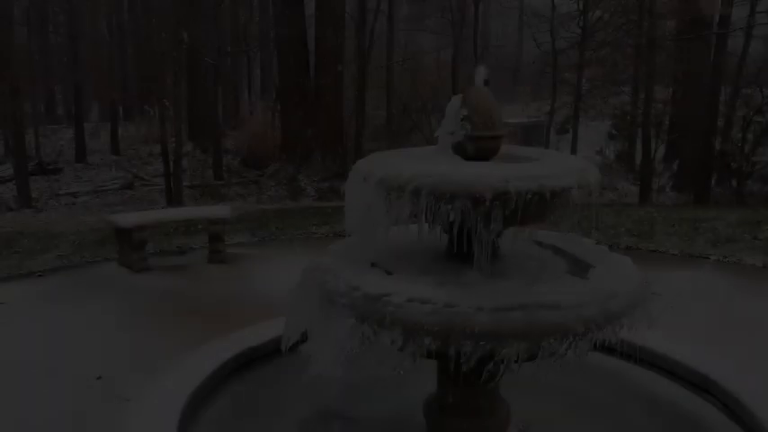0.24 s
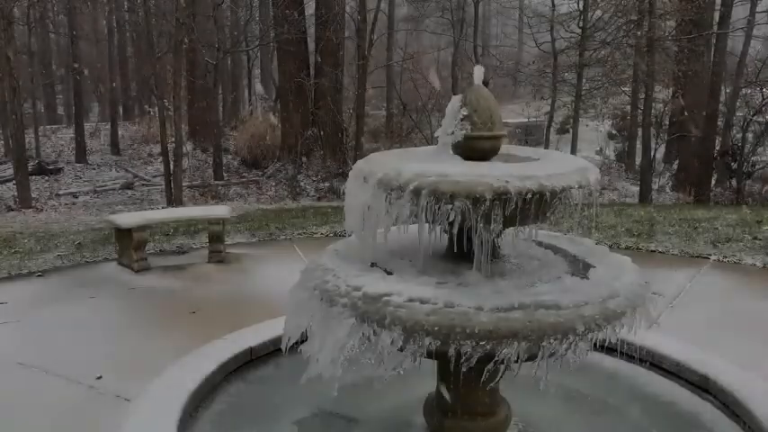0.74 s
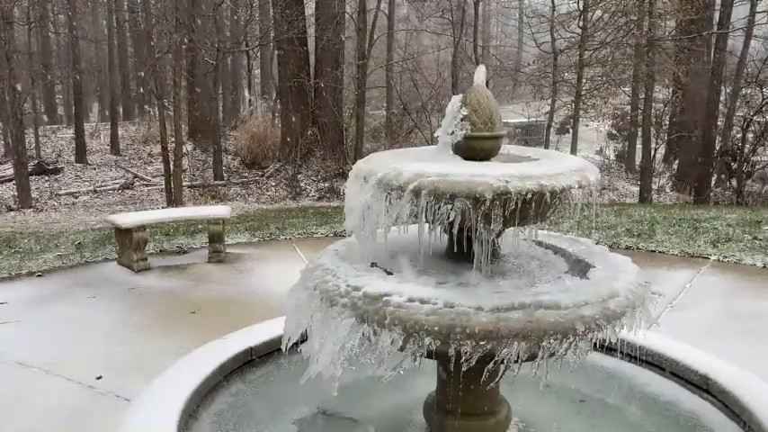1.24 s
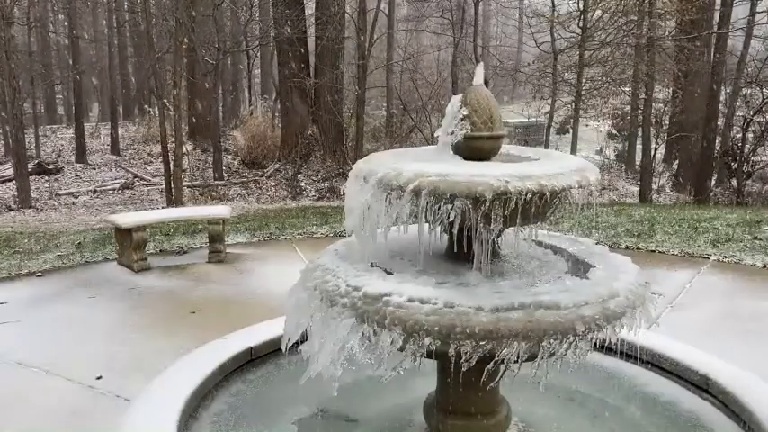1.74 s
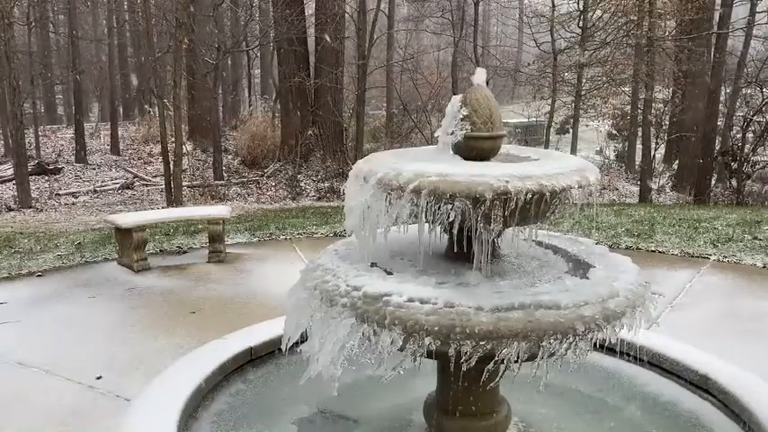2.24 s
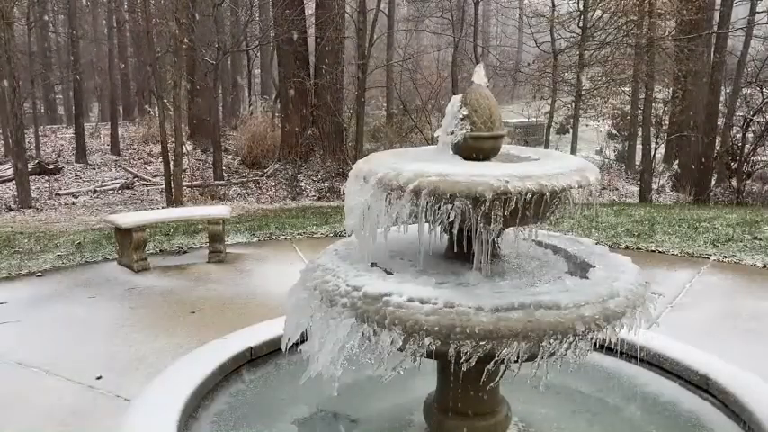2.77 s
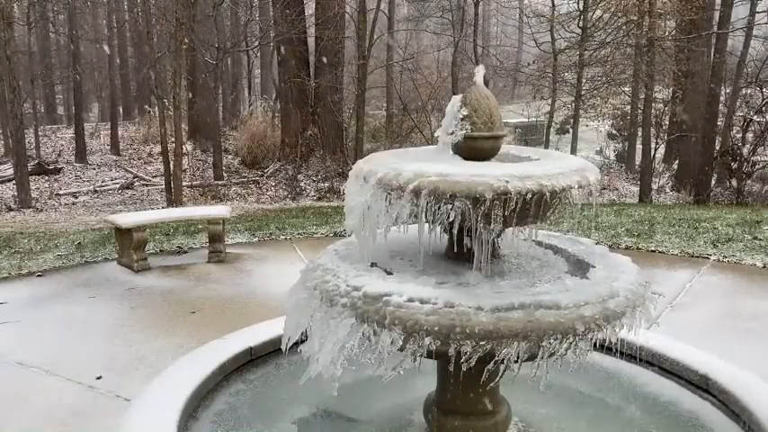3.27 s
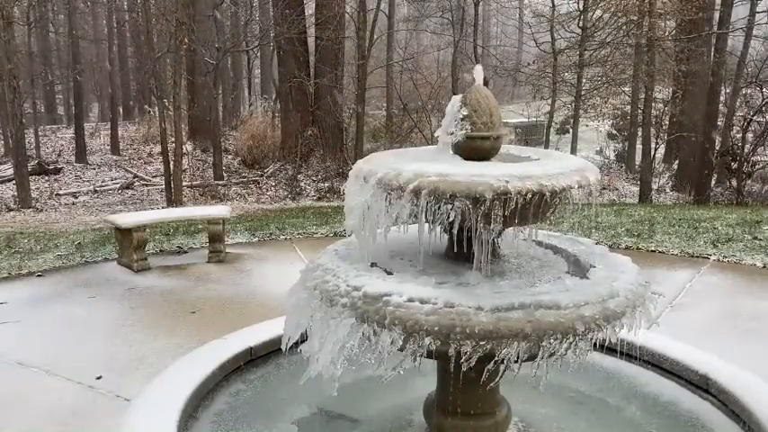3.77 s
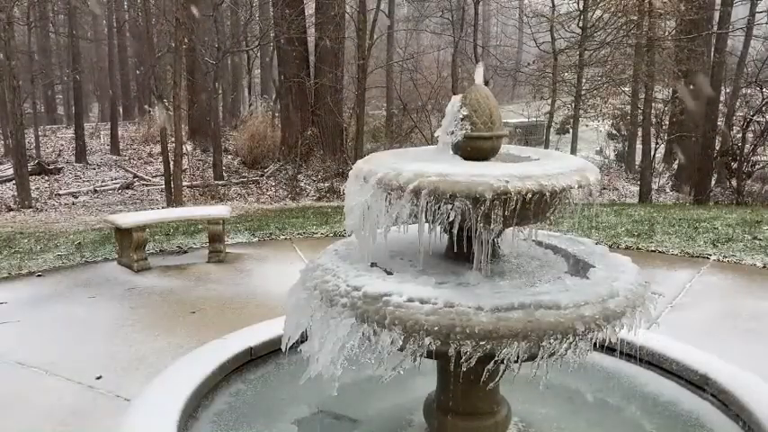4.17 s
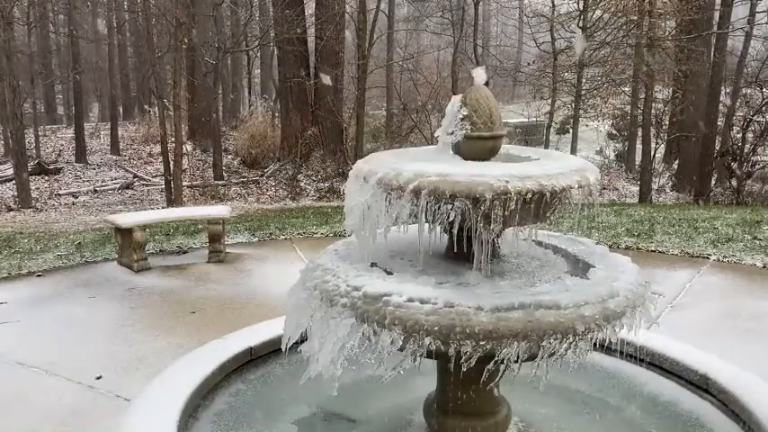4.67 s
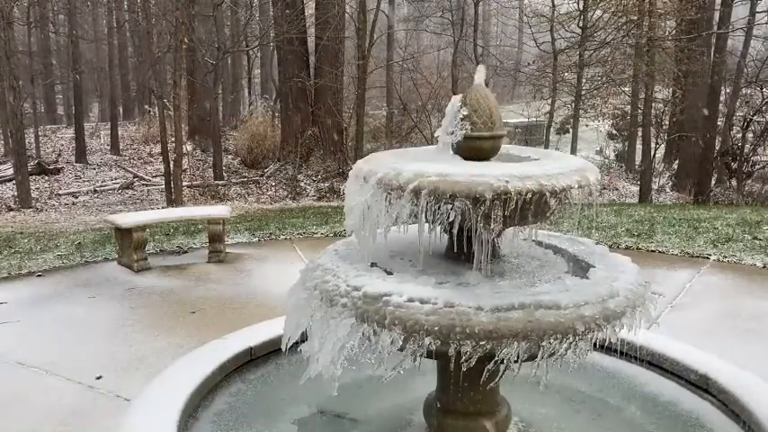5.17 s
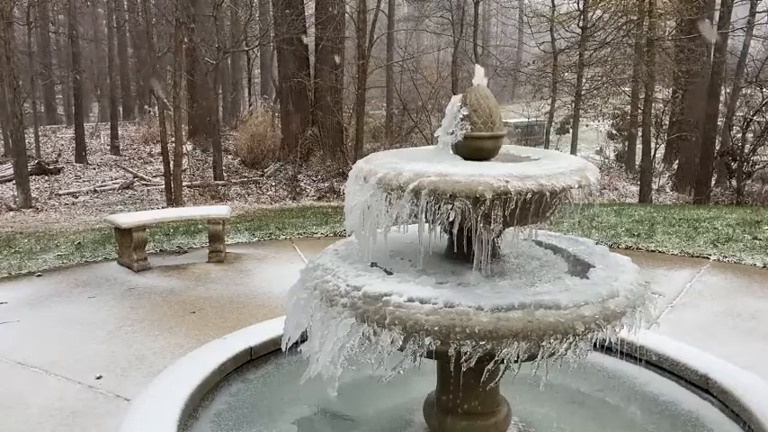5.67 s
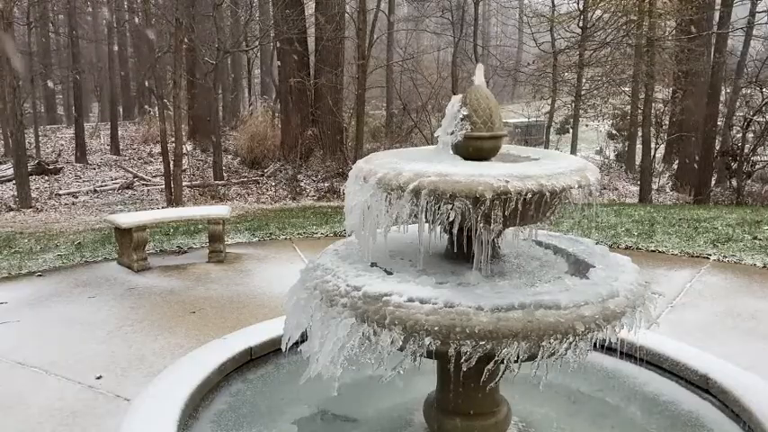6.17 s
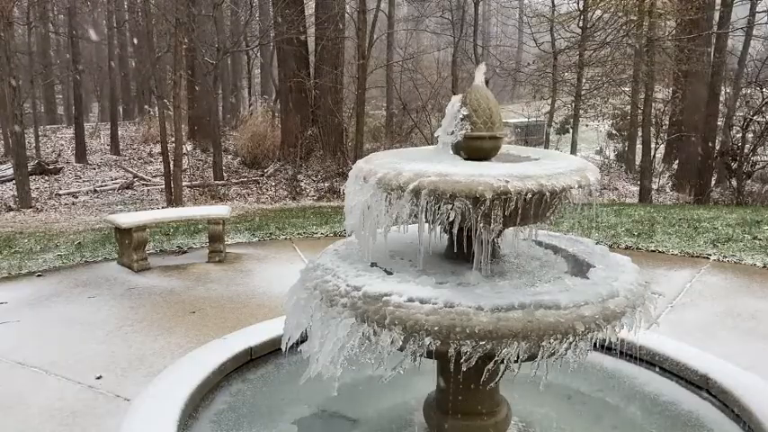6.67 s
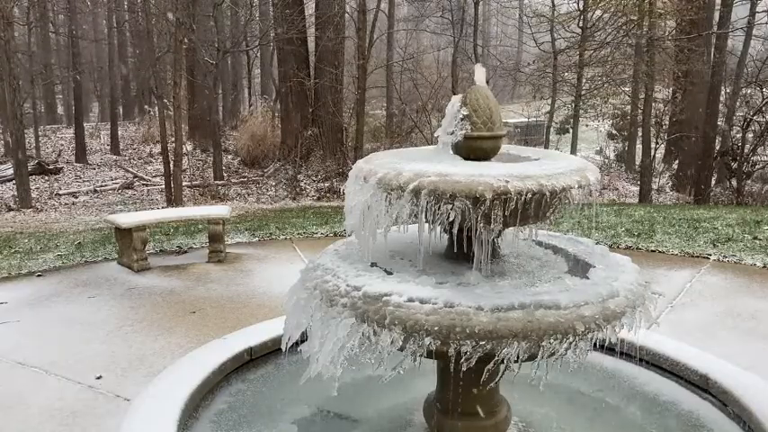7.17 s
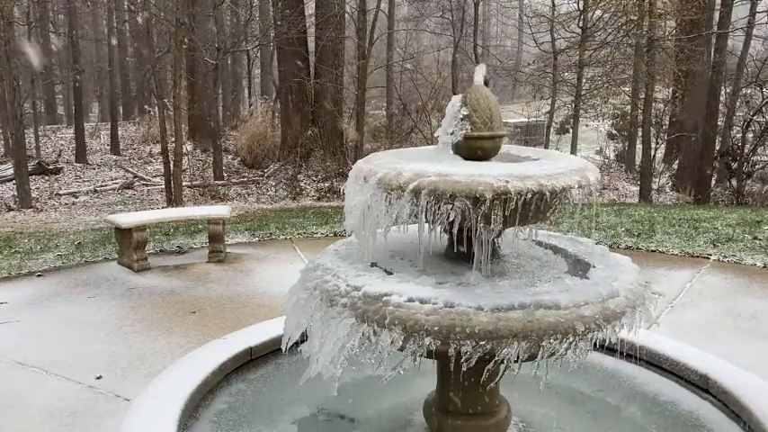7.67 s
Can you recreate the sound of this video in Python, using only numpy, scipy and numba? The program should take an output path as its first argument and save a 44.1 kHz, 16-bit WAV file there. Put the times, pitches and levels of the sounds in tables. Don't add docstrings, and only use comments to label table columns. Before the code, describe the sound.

A half-frozen fountain gurgles, fizzes and drips close by outdoors, with sharp splats on ice and a faint far engine late on.

```python
import sys
import numpy as np
from scipy import signal
from scipy.fft import rfft, irfft, next_fast_len
from scipy.io import wavfile
from scipy.ndimage import uniform_filter1d
from numba import njit

SR = 44100
rng = np.random.default_rng(int(sys.argv[2]) if len(sys.argv) > 2 else 0)


def generate_wav(signal):
    frames = np.transpose(np.atleast_2d(signal))
    scaled = np.clip(frames, -1, 1) * 32767
    pcm = np.round(scaled).astype(np.int16)
    wavfile.write(sys.argv[1], SR, pcm)


def voltage_ratio(level):
    return 10 ** (np.asarray(level, float) / 20)


N = 348732
TIME_S = np.arange(N) / SR
PADDED = next_fast_len(N)
FREQS = np.fft.rfftfreq(PADDED, 1 / SR)

# frequency in Hz, level in dB per Hz.
WATER_SPECTRUM = [(250, -14.5), (350, -17.5), (500, -11.5), (800, -11), (1300, -11), (1800, -13.5),
                  (2300, -20), (3500, -23), (5000, -23.5), (7500, -23.5), (8500, -21), (11000, -24.5),
                  (13000, -28), (15500, -27.5)]
# time in seconds, level in dB.
RIM_FLOW = [(1.1, -1.5), (1.5, -0.4), (2.0, -0.2), (2.35, -4.5), (2.6, 0.2), (2.85, -1.3), (3.3, -0.65),
            (3.95, -2), (4.6, -0.8), (5.1, -1.2), (5.4, -1.1), (5.85, -0.2), (6.35, -2.5), (6.85, -0.3),
            (7.35, -1.1), (7.6, 1.1), (7.9, -1)]
# frequency in Hz, lateness of the left port in samples.
LEFT_PORT_LAG = [(2200, 3), (4800, 3.66), (9000, 3.49), (12000, 3.7), (14000, 2.95), (15600, 3.5)]
# frequency in Hz, level in dB per Hz.
ROAD_SPECTRUM = [(15, -44), (25, -37), (45, -5), (70, 3), (86, -1.5), (162, -11), (243, -15.5),
                 (314, -19.5), (400, -22), (520, -46), (880, -120)]
# time in seconds, level in dB.
ROAD_SWELL = [(1.1, -1.1), (2.1, -.8), (2.85, -0.2), (3.8, 1.1), (4.15, -0.5), (4.8, -0.7), (5.6, 0.5),
              (5.9, 0.3), (6.5, 1.3), (7.9, 1)]
# peak in seconds, level in dB, pitch in Hz, glide in octaves.
BOWL_BUBBLES = [(0.123, -36.5, 1640, .14), (0.249, -37.5, 2290, 0.33), (0.811, -38, 1640, 0.19),
                (0.925, -36, 1510, -0.085), (1.636, -43.5, 1340, .45), (1.67, -39.5, 1320, .22),
                (2.022, -38, 2060, 0.31), (2.457, -42.5, 1570, -.39), (2.591, -38.5, 1890, .08),
                (2.771, -37.5, 1850, -0.23), (2.912, -37, 1770, .05), (2.991, -39, 1970, .09),
                (3.07, -38, 1450, -0.15), (3.143, -39, 2030, 0.87), (3.223, -41.5, 1450, .11),
                (3.412, -35.5, 1420, 0), (3.677, -36, 1910, 0.69), (3.713, -37.5, 1870, .13),
                (4.307, -40.5, 1520, -0.086), (5.212, -34.5, 1330, 0.14), (5.633, -38, 1930, .08),
                (5.706, -39.5, 1470, 0), (5.95, -39, 1730, 0.38), (6.623, -29, 1580, 0.032),
                (6.648, -40, 1980, 0.003), (6.97, -40, 1850, .35), (7.368, -39, 1800, 0),
                (7.525, -42, 2080, -0.037), (7.627, -44, 1600, 0.16), (7.802, -38.5, 1250, 0.81)]
# peak in seconds, level in dB, pitch in Hz, glide in octaves.
BASIN_BUBBLES = [(5.065, -41, 732, 0.85), (1.613, -38.5, 865, 0.1), (1.825, -44.5, 510, 0.35),
                 (1.953, -40, 1140, -.2), (2.036, -39, 1050, -0), (2.147, -39, 1030, .11),
                 (2.285, -36.5, 1210, .42), (2.745, -40.5, 1270, .29), (2.906, -35, 1030, .14),
                 (3.066, -36.5, 980, .1), (3.128, -33, 1180, .56), (3.716, -41.5, 924, .11),
                 (3.005, -43, 520, 0.45), (4.306, -41.5, 925, 0.1), (4.34, -37, 1210, .43),
                 (4.496, -39.5, 445, 0.33), (4.727, -41, 448, .55), (4.86, -40.5, 800, .55),
                 (5.011, -41, 515, 0.3), (5.337, -39, 916, -0.2), (5.695, -41.5, 985, -.15),
                 (5.782, -37.5, 1130, -0.057), (5.874, -37.5, 1050, 0.34), (6.486, -38.5, 1040, 0.3),
                 (6.549, -41.5, 710, 0.7), (7.13, -39, 1100, .6), (6.829, -37.5, 990, .6),
                 (5.65, -42.5, 460, -0.32), (7.008, -35.5, 1160, -0.07), (7.258, -42.5, 440, -0.16)]
# peak in seconds, level in dB, pitch in Hz, length in ms.
DROPLET_TICKS = [(0.218, -38.5, 4130, 1.4), (0.42, -26, 5000, .7), (0.713, -28, 2900, 0.49),
                 (1.357, -39, 14990, .8), (1.398, -28, 5900, 0.88), (1.609, -29, 3040, 0.77),
                 (1.61, -33, 4670, 1.6), (1.961, -37, 9000, 1.5), (2.317, -32, 2150, 1.3),
                 (2.571, -36, 2700, 2.8), (3.059, -38, 6800, 3.0), (3.152, -35, 6500, 1.3),
                 (3.186, -37, 4310, 1.5), (3.224, -39, 5800, 6.1), (3.331, -30, 7060, 2.1),
                 (3.648, -30, 7100, 0.98), (3.715, -35, 14130, 1.3), (3.891, -34, 5670, 2.9),
                 (3.946, -30, 6890, .5), (4.192, -35, 8100, 2.4), (4.875, -33.5, 3840, 1.2),
                 (5.128, -28, 8540, 1.2), (5.304, -37, 9300, .8), (6.213, -33, 12500, .7),
                 (0.252, -38.5, 3000, 2.5), (6.477, -39, 5370, 1.3), (5.502, -40, 6130, 3.5),
                 (6.829, -36, 9600, 1.3), (7.104, -35, 8200, 1.5)]
# peak in seconds, peak level in dB.
ICE_SPLATS = [(0.2523, -31), (1.0837, -27), (1.3976, -35), (1.408, -25.5), (1.9879, -36), (2.467, -26),
              (2.4854, -33), (2.6132, -29), (2.635, -34), (2.7542, -22), (3.2238, -26.5), (3.06, -35),
              (3.7017, -30), (4.0694, -27), (4.076, -27), (4.0938, -32), (4.4587, -28), (4.5668, -29),
              (5.0542, -31), (5.1289, -30), (5.2309, -28), (5.4276, -27), (5.502, -24), (5.5521, -32),
              (6.2259, -25), (6.2876, -23), (6.477, -21), (7.2467, -27), (7.3367, -28), (7.3594, -25)]
# time in seconds, pitch in Hz, level in dB.
ENGINE_DRONE = [
    (4.9, 128, -79),
    (5.35, 129.5, -52),
    (5.8, 131.5, -50.5),
    (6.2, 133, -49),
    (6.55, 134, -49),
    (7.0, 135, -51),
    (7.4, 135, -65),
    (7.9, 136, -53.5),
]
# peak in seconds, level in dB, pitch in Hz, length in ms, glide in octaves.
BIG_DROP = [
    (5.4283, -20.5, 2600, 2.65, 0.086),
    (5.4298, -15, 3620, 2.2, 0.55),
    (5.4312, -16, 4800, 3.2, 0.082),
    (5.4327, -19, 4060, 2.4, .05),
    (5.4358, -37, 4700, 2.5, .1),
    (5.4384, -26, 3220, 3, 0.14),
    (5.4447, -30.5, 2180, 2, 0.12),
]


def level(x, db):
    return x * voltage_ratio(db) / np.sqrt(np.mean(x ** 2))


def colour_db(spectrum, hz):
    at, db = np.transpose(spectrum)
    return np.interp(np.log(np.maximum(hz, 1)), np.log(at), db)


def walk(rate):
    hold = int(SR / rate)
    steps = np.repeat(rng.standard_normal(N // hold + 1), hold)
    return 1.3 * uniform_filter1d(uniform_filter1d(steps, hold), hold)[:N]


def swell_db(curve):
    s, db = np.transpose(curve)
    db = np.interp(TIME_S, s, db)
    return db - db.mean()


def port_lag(hz):
    return np.interp(hz, *np.transpose(LEFT_PORT_LAG))


def places(hz, lag_spread, pan_db):
    lag_chance, pan_chance = rng.standard_normal((len(hz), 2)).T
    return port_lag(hz) + lag_spread * lag_chance, voltage_ratio(pan_db * pan_chance / 2)


@njit
def grains(peak_s, size, hz, rise_s, glide, lag, pan, length):
    out = np.zeros((2, length))
    for k in range(len(hz)):
        start = (peak_s[k] - rise_s[k] / 2) * SR
        bend = glide[k] * np.log(2) / 3
        for ch in range(2):
            begin = start + lag[k] * (1 - ch)
            gain = size[k] * (pan[k] if ch == 0 else 1 / pan[k])
            for i in range(max(int(begin) + 1, 0), min(int(begin + 8 * rise_s[k] * SR), length)):
                u = (i - begin) / SR / rise_s[k]
                turns = hz[k] * rise_s[k] * (u + bend * (u * u - u) / 2)
                out[ch, i] += gain * np.sqrt(2 * u) * np.exp(.5 - u) * np.sin(2 * np.pi * turns)
    return out


def noise(gain, likeness, lag):
    shared, left, right = rfft(rng.standard_normal((3, PADDED))) * gain
    late = np.exp(-2j * np.pi * FREQS * lag / SR)
    likeness = np.clip(likeness, 0, 1)
    common = np.sqrt(likeness) * np.array([shared * late, shared])
    own = np.sqrt(1 - likeness) * np.array([left, right])
    return irfft(common + own, PADDED)[:, :N]


def swarm(count, low_hz, high_hz, cycles, glide, scatter_db, bunch_rate, bunching, lag_spread, pan_db):
    when, pitch, long, big = rng.random((count, 4)).T
    density = np.cumsum(np.exp(bunching * walk(bunch_rate)))
    s = np.interp(when, density / density[-1], TIME_S)
    hz = low_hz * (high_hz / low_hz) ** pitch
    size = hz * voltage_ratio(colour_db(WATER_SPECTRUM, hz) + scatter_db * np.minimum(-np.log(big), 3))
    rise_s = cycles * (.5 + long) / 3 / hz
    return grains(s, size, hz, rise_s, glide * 2 * long, *places(hz, lag_spread, pan_db), N)


def sheets(flicker_db, likeness):
    out = 0
    for hz in 250 * 2. ** np.arange(7):
        octaves_off = np.clip(np.log2(np.maximum(FREQS, 1) / hz), -1, 1)
        gain = np.cos(np.pi / 2 * octaves_off) * voltage_ratio(colour_db(WATER_SPECTRUM, FREQS))
        flicker = voltage_ratio(flicker_db * walk(24) + np.interp(hz, [1000, 4000], [-4.5, 0]))
        out = out + flicker * noise(gain, likeness, port_lag(FREQS))
    return out


def water_bed(flow_db):
    gurgle = swarm(count=2700, low_hz=330.6, high_hz=2600, cycles=14.15, glide=0.255, scatter_db=1.04,
                   bunch_rate=12, bunching=.5, lag_spread=2.4, pan_db=5.0)
    fizz = swarm(count=18000, low_hz=2120, high_hz=15850, cycles=6.76, glide=0.055, scatter_db=4.0,
                 bunch_rate=45, bunching=.6, lag_spread=0.14, pan_db=1.5)
    patter = swarm(count=1500, low_hz=1890, high_hz=14100, cycles=2.2, glide=.01, scatter_db=2.5,
                   bunch_rate=50, bunching=.8, lag_spread=.12, pan_db=3.5)
    plash = swarm(count=700, low_hz=704, high_hz=3580, cycles=3.47, glide=.6, scatter_db=2.0,
                  bunch_rate=30, bunching=.7, lag_spread=.8, pan_db=3.5)
    likeness = np.interp(FREQS, [1500, 3000, 5400, 9000, 12000], [0.79, 0.3, 0.92, 0.93, 0.71])
    hiss = sheets(flicker_db=1.3, likeness=likeness)
    deep = level(gurgle, -47.5) + level(plash, -54.5)
    spray = level(fizz, -48.0) + level(patter, -60) + level(hiss, -45.0)
    return deep * voltage_ratio(1.7 * flow_db) + spray * voltage_ratio(0.05 * flow_db)


def road_rumble():
    likeness = np.interp(FREQS, [40, 130], [.6, .96])
    rumble = noise(voltage_ratio(colour_db(ROAD_SPECTRUM, FREQS)), likeness, lag=0)
    return level(rumble * voltage_ratio(swell_db(ROAD_SWELL) + 0.46 * walk(6.09)), -44.0)


def clear_drops(s, db, hz, ms, glide, sharpness, lag_spread):
    return grains(s, voltage_ratio(db), hz, ms / 1000 / sharpness, glide, *places(hz, lag_spread, pan_db=2.5), N)


def bubbles(pool):
    s, db, hz, glide = np.transpose(pool).astype(float)
    ring_ms = 13.84 * 2 ** (-(db + 37.5) / 8.5) * (hz / 1000) ** -.45
    return clear_drops(s, db + 3.0, hz, ring_ms, glide, sharpness=3.8, lag_spread=1.6)


def droplet_ticks():
    s, db, hz, ms = np.transpose(DROPLET_TICKS).astype(float)
    return clear_drops(s, db + 4.5, hz, ms, 0 * s, sharpness=2.5, lag_spread=.25)


def ice_splats():
    s, db = np.transpose(ICE_SPLATS).astype(float)
    hz = rng.uniform(7500, 13900, len(s))
    crack = grains(s, voltage_ratio(db + 2.5), hz, 1.0 / hz, 0 * s, *places(hz, lag_spread=0.2, pan_db=3.5), N)
    count = 10
    s, db = np.repeat([s, db], count, axis=1)
    pitch, late = rng.random((len(s), 2)).T
    hz = 4000 + 11500 * (np.arange(len(s)) % count + pitch) / count
    size = voltage_ratio(db - 6 - 12 * late)
    s = s + 0.0092 * late ** 2
    shards = grains(s, size, hz, 5.7 / 3 / hz, 0 * s, *places(hz, lag_spread=0.11, pan_db=4.5), N)
    return crack + shards


def paving(x, wet_db, t60_s):
    t = np.arange(int(t60_s * SR)) / SR
    tail = rng.standard_normal(len(t)) * voltage_ratio(-60 * t / t60_s) * (t > .0008)
    tail = tail * voltage_ratio(wet_db) / np.sqrt(np.sum(tail ** 2))
    return x + signal.fftconvolve(x, tail[None], axes=1)[:, :N]


def engine_drone():
    s, hz, db = np.transpose(ENGINE_DRONE)
    phase = 2 * np.pi * np.cumsum(np.interp(TIME_S, s, hz) + 0.28 * walk(4.06)) / SR
    loudness = np.sqrt(2) * voltage_ratio(np.interp(TIME_S, s, db) + 0.44 * walk(8.0))
    return loudness * (np.sin(phase) + voltage_ratio(-13.5) * np.sin(3 * phase) + voltage_ratio(-12.5) * np.sin(5 * phase))


def big_drop():
    s, db, hz, ms, glide = np.transpose(BIG_DROP).astype(float)
    return clear_drops(s, db - 2.5, hz, ms, glide, sharpness=3.2, lag_spread=0.44)


def scene():
    pools = bubbles(BASIN_BUBBLES) + bubbles(BOWL_BUBBLES)
    sharp_drops = paving(droplet_ticks() + big_drop() + ice_splats(), wet_db=-8, t60_s=0.04)
    fountain = water_bed(swell_db(RIM_FLOW)) + pools + sharp_drops
    road = (road_rumble() + engine_drone()) * voltage_ratio(np.array([[-.6], [.6]]))  # left, right dB
    return fountain + road


def low_pass(x):
    return signal.sosfilt(signal.butter(12, 16310, fs=SR, output="sos"), x)


def record(dry):
    top_cut = signal.ellip(14, .5, 70, 15720, fs=SR, output="sos")
    fade = np.interp(TIME_S, [0.041, 1.08], [0, 1])
    return low_pass(signal.sosfilt(top_cut, dry) * fade)


dry = scene()
out = record(dry)
generate_wav(out)
```